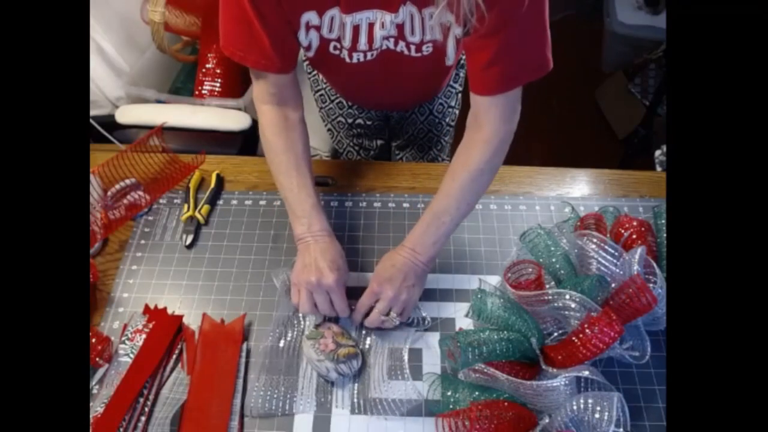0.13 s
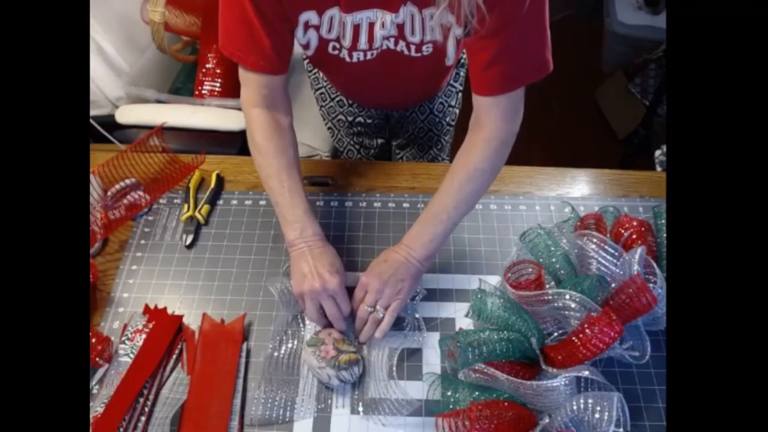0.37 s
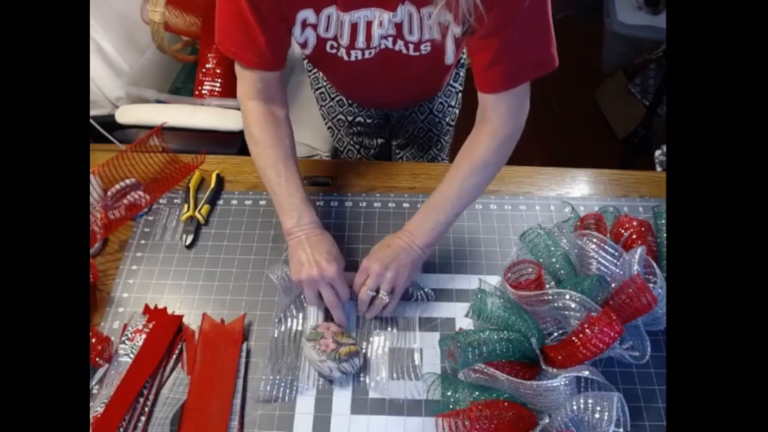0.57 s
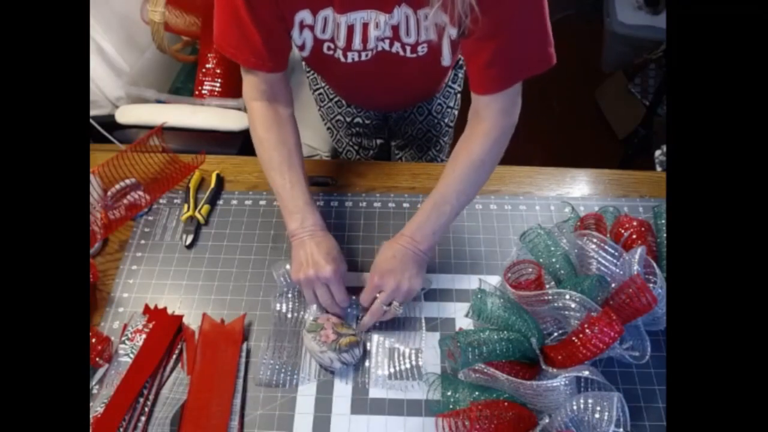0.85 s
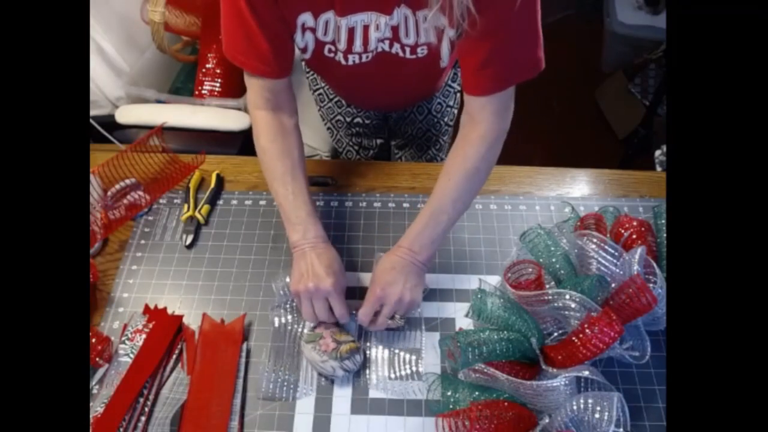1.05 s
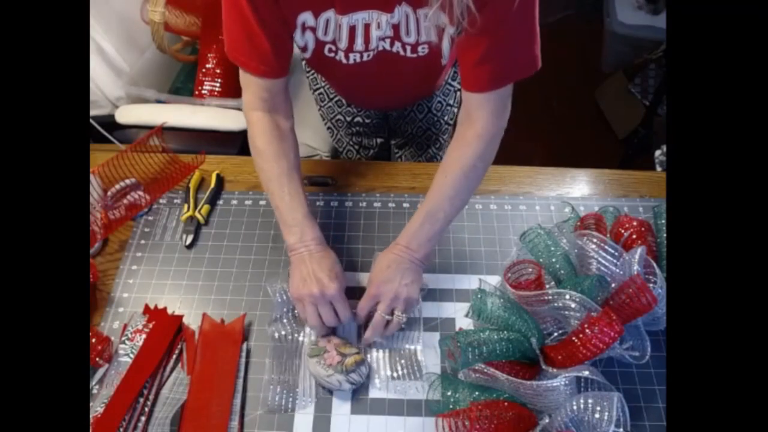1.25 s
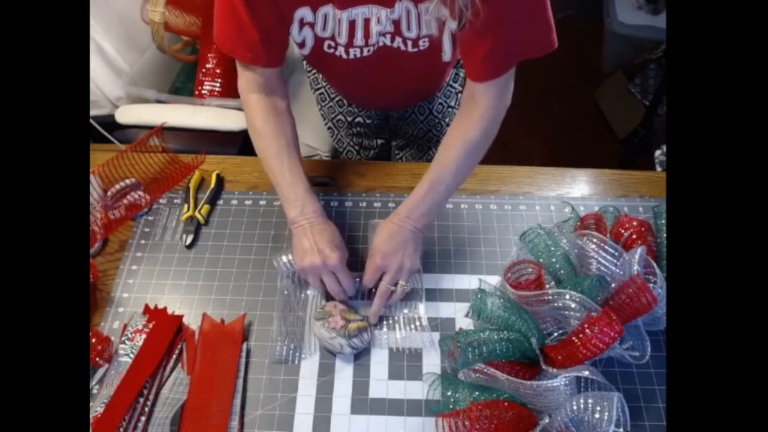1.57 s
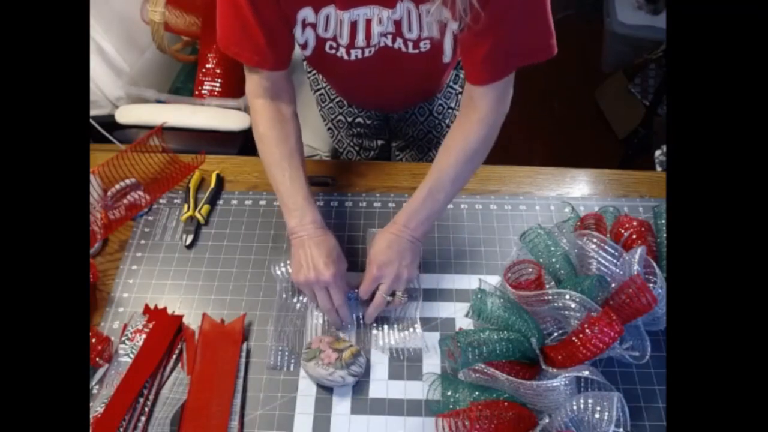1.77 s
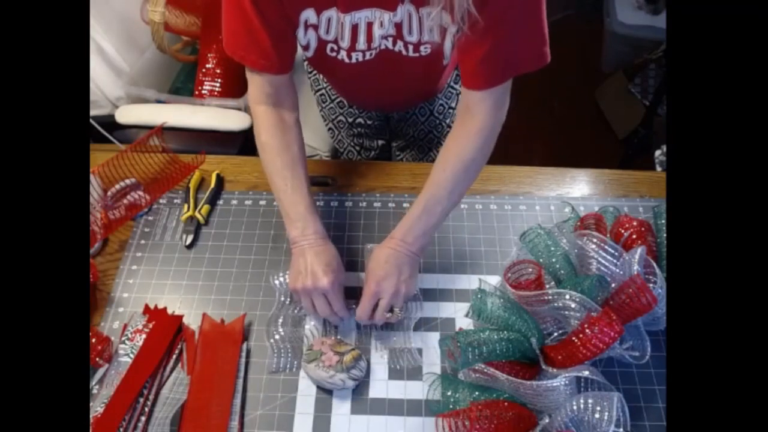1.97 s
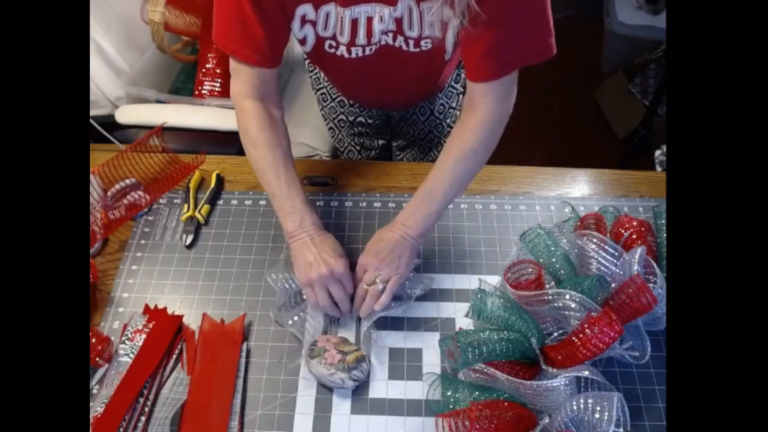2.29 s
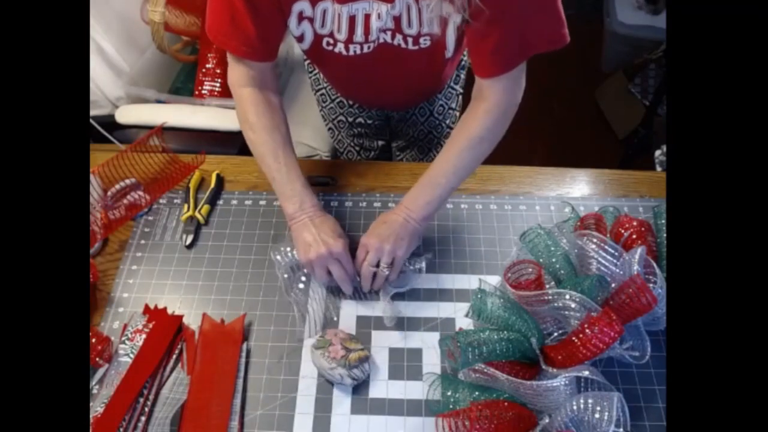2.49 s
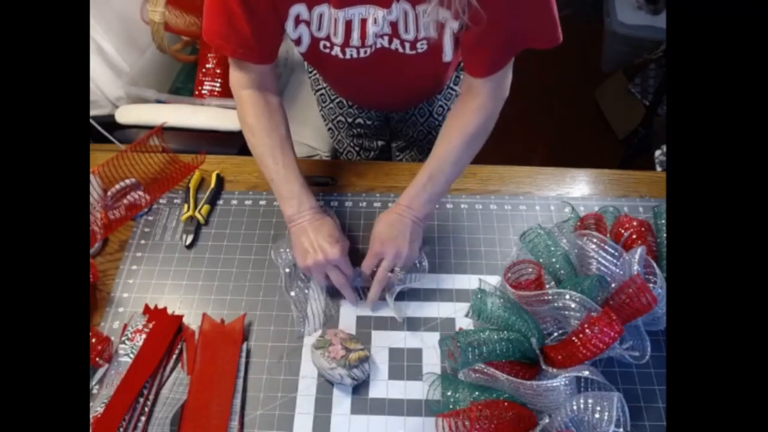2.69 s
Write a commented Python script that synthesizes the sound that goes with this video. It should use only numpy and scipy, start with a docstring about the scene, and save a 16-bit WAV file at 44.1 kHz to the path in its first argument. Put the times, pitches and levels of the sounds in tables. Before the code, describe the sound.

Crinkling plastic mesh swells and fades as it is scrunched and dragged over a work table, with tiny sharp snaps. Dull finger thumps and a low table rumble run underneath, with one light hollow knock, in a quiet small room.

```python
"""A low rumble and a faint rustle come first: hands gather plastic foil mesh on a cutting mat.
With each push the strands rub and snap, the mesh drags in small slips, and stick-slip friction
shakes the work table. Fingers land with soft thumps that excite the table's modes, at times
skidding the mesh, and once something harder knocks on the top and settles.
The small room hums faintly and adds a short reverberation."""
import sys
import numpy as np
from scipy import signal
from scipy.fft import rfft, irfft
from scipy.io import wavfile
from scipy.ndimage import uniform_filter1d

SR = 44100
rng = np.random.default_rng(int(sys.argv[2]) if len(sys.argv) > 2 else 0)


def bounce(signal):
    """Save signal as a 16-bit WAV file at the path given by the first command-line argument."""
    frames = np.transpose(np.atleast_2d(signal))
    limited = np.clip(frames, -1, 1)
    pcm = np.round(limited * 32767).astype(np.int16)
    wavfile.write(sys.argv[1], SR, pcm)


N = 125685
TIME = np.arange(N) / SR

# Levels in the tables are relative; the functions set the overall gains.
# Spectrum of the room's background noise: f/Hz, level/dB
ROOM_SPECTRUM = [(10, -10), (21, 7), (40, -5.5), (60, -0.5), (120, -15.5), (220, -40.5), (420, -15),
                 (700, -23.5), (1500, -55.5), (4000, -44.5), (7000, -37.5), (9000, -64)]
# Partials of the room's hum: f/Hz, level/dB
HUM_PARTIALS = [(247.6, -61), (302, -73.5), (366, -76.5), (436, -63.5), (532.9, -69.5), (666, -71)]
# Envelope of strands rubbing together, swelling with each push: t/s, level/dB
RUSTLE_ENVELOPE = [(0.0, -60.5), (0.13, -60), (0.24, -54.5), (0.29, -60), (0.42, -57.5), (0.53, -48.5),
                   (0.65, -47), (0.74, -60), (0.83, -55.5), (0.91, -51), (1.1, -57.5), (1.205, -67),
                   (1.27, -44.5), (1.35, -59.5), (1.43, -47), (1.53, -45), (1.61, -58.5), (1.71, -50),
                   (1.82, -51), (1.9, -56.5), (2.1, -64.5), (2.24, -54.5), (2.35, -46), (2.52, -51.5),
                   (2.63, -57.5), (2.7, -73.5), (2.78, -73.5), (2.85, -54.5)]
# Spectrum of the rubbing strands: f/Hz, level/dB
MESH_SPECTRUM = [(500, -21), (900, -18), (1500, -3.5), (2000, -2), (2800, 1.5), (3600, 0), (4600, -1.5),
                 (5600, 1), (6400, 1.5), (7200, -1.5), (7700, -8), (8100, -16), (9000, -33)]
# Envelope of the mesh dragging over the mat: t/s, level/dB
DRAG_ENVELOPE = [(0.0, -63), (0.3, -60.5), (0.46, -58.5), (0.54, -46.5), (0.63, -42.5), (0.72, -54.5),
                 (0.9, -54.5), (1.12, -58.5), (1.2, -65.5), (1.27, -50), (1.35, -57), (1.5, -45),
                 (1.66, -54), (1.71, -51), (1.83, -47), (2.0, -63), (2.23, -59), (2.34, -47.5),
                 (2.41, -46.5), (2.45, -48), (2.51, -49), (2.61, -58.5), (2.85, -68.5)]
# Spectrum of the mesh slipping on the mat: f/Hz, level/dB
DRAG_SPECTRUM = [(150, -21), (300, 5.5), (480, 3), (600, 1), (690, -1), (800, 1.5), (950, -1.5),
                 (1060, -1.5), (1250, -7), (1420, -12.5), (1540, -6.5), (1800, -15), (2600, -13.5),
                 (6000, -48.5)]
# Envelopes of the table's vibration under the hands: t/s, boom level/dB, body level/dB
RUMBLE_ENVELOPES = [(0.0, -44, -53), (0.15, -39.5, -49.5), (0.21, -24, -49), (0.28, -37.5, -41),
                    (0.41, -34.5, -47.5), (0.48, -29, -34.5), (0.55, -19.5, -34.5), (0.61, -25, -43),
                    (0.72, -31.5, -35), (0.83, -35.5, -50), (0.97, -28, -42.5), (1.08, -34.5, -39.5),
                    (1.21, -37, -46.5), (1.27, -29.5, -28), (1.33, -34, -35), (1.4, -22.5, -38),
                    (1.48, -30, -41), (1.62, -26, -34.5), (1.67, -30, -38), (1.72, -23, -28),
                    (1.8, -22.5, -35.5), (1.97, -38.5, -47), (2.12, -42.5, -56), (2.26, -48, -51.5),
                    (2.34, -27.5, -38.5), (2.44, -21, -31), (2.53, -47, -43.5), (2.68, -41, -67),
                    (2.85, -67, -62)]
# Spectrum of the table's deep boom: f/Hz, level/dB
BOOM_SPECTRUM = [(30, -27.5), (45, -22), (56, 6.5), (70, 2.5), (82, 7.5), (92, 14), (102, 5), (115, 1.5),
                 (145, -7), (220, -50.5), (900, -59)]
# Spectrum of the table's wooden body: f/Hz, level/dB
BODY_SPECTRUM = [(40, -37.5), (90, -19.5), (140, 8.5), (195, 4), (222, 1.5), (245, -2), (275, -8),
                 (308, 6.5), (324, -5), (343, 0.5), (375, -2), (440, -11.5), (600, -16), (1000, -38),
                 (3000, -73)]
# Fingers landing on the table: t/s, level/dB, contact low-pass f/Hz, boom f/Hz
FINGER_BLOWS = [(0.198, -32, 115, 78.6), (0.267, -44.5, 259, 99), (0.316, -42.5, 238, 101),
                (0.429, -31.5, 257, 100), (0.459, -22, 119, 87.3), (.662, -26, 156, 89),
                (0.748, -39, 224, 88), (0.943, -27, 171, 87), (1.236, -27, 170, 105),
                (1.263, -29, 250, 108), (1.294, -27.5, 330, 104), (1.318, -30, 220, 110),
                (1.347, -20.5, 180, 81), (1.623, -28.5, 148, 89.5), (1.6937, -22, 220, 85),
                (1.749, -33, 170, 90), (1.954, -37.5, 240, 100), (2.32, -27.5, 161, 85),
                (2.398, -18.5, 100, 90), (2.425, -18.5, 130, 92), (2.434, -22.5, 363, 95)]
# Modes of the table top above its boom: f/Hz, level/dB, T60/s
TOP_MODES = [(113, -11.5, 0.043), (152.8, -4, 0.045), (188, -2, 0.16), (233, 2, 0.032), (309, -10, 0.1),
             (342, -3.5, 0.22), (493, -0.5, 0.053)]
# Single strands snapping free: t/s, level/dB, ring f/Hz, tip level/dB relative to the snap
STRAND_SNAPS = [(0.3127, -31.5, 6400, -16), (0.322, -49, 6500, -2), (0.3482, -38, 5900, -17),
                (0.364, -39, 3200, -14.5), (0.407, -36.5, 6040, -7), (0.4248, -44, 6200, -7),
                (0.4336, -32.5, 6260, -14), (0.4409, -34, 3250, -18), (0.5145, -30.5, 5260, -25),
                (0.5339, -31, 3200, -22), (0.5616, -29.5, 3400, -30), (0.57, -28.5, 6230, -23),
                (0.7568, -40, 2900, -10), (0.782, -34, 5830, -18), (0.9034, -35, 2840, -24),
                (1.1328, -37, 3500, -24), (1.227, -43.5, 2920, -16), (1.2494, -38.5, 2840, -23),
                (1.255, -34, 5500, -19), (1.267, -32, 2730, -16), (1.2808, -43, 2600, -22),
                (1.297, -36, 5800, -22), (1.3133, -35.5, 6640, -19), (1.6265, -28.5, 7000, -3),
                (1.642, -35.5, 6460, -10), (1.694, -36, 6300, -21), (1.71, -44, 3500, -8.5),
                (1.729, -32, 3960, -24), (1.771, -34.5, 2940, -18), (1.8185, -30, 6300, -13),
                (1.869, -41.5, 6200, -16), (2.063, -43.5, 6200, -14), (2.1253, -44.5, 3380, -20),
                (2.1808, -39.5, 5800, -22), (2.2887, -45, 6140, -26), (2.371, -32.5, 6100, -12),
                (2.587, -46, 5360, -18), (2.6932, -46, 5850, -18), (2.7276, -50, 5980, -20),
                (2.801, -47, 5960, -18), (2.843, -41, 6200, -14)]
# The mesh skidding as a finger lands: t/s, level/dB, decay time constant/s
SKIDS = [(0.759, -50, 0.026), (1.388, -46.5, 0.029), (1.696, -42.5, 0.042), (2.436, -41.5, 0.056)]
# A hard object striking the top and settling: t/s, level/dB
HARD_BLOWS = [(1.8864, -27.5), (1.9075, -33), (1.9229, -37.5), (2.03, -49)]
# Modes excited by the hard object: f/Hz, level/dB, T60/s
HOLLOW_MODES = [(253, 5, 0.024), (336.6, 1, 0.1), (493, -3.5, 0.08), (596, 0, 0.074), (770, -2, 0.037),
                (835.7, -9, 0.23), (938, -19, 0.15), (1125, -11.5, .05)]

# Ratios of reverberant to direct sound shared by several sources
DRAG_WET_DB, TABLE_WET_DB = -9, -16.5


def from_db(db):
    """Amplitude ratio of a level: a factor of ten per 20 dB."""
    return 10 ** (np.asarray(db) / 20)


def unit_rms(x):
    """Normalisation to unit mean power."""
    return x / np.sqrt(np.mean(x ** 2) + 1e-20)


def envelope(rows, column=1):
    """Gain curve, linear in dB between points: exponential growth and decay."""
    rows = np.array(rows)
    return from_db(np.interp(TIME, rows[:, 0], rows[:, column]))


def colour(x, spectrum):
    """Minimum-phase filtering to the given spectrum, at unit rms."""
    size = 2 ** 18
    hz, db = np.transpose(spectrum)
    bin_hz = np.arange(size // 2 + 1) * SR / size
    log_gain = np.log(from_db(np.interp(np.log(bin_hz + 1), np.log(hz), db)))
    cepstrum = irfft(log_gain)
    cepstrum[1:size // 2] *= 2  # folding onto positive time makes the filter causal
    cepstrum[size // 2 + 1:] = 0
    return unit_rms(irfft(rfft(x, size) * np.exp(rfft(cepstrum)))[:N])


def butter(x, hz, kind, order=2):
    """Filtering with a maximally flat passband."""
    return signal.sosfilt(signal.butter(order, hz, kind, fs=SR, output="sos"), x + 1e-18)


def ring(force, hz, t60):
    """Damped oscillator: a unit impulse starts a unit sine that falls 60 dB in t60 seconds."""
    radius = np.exp(-np.log(1000) / (t60 * SR))
    angle = 2 * np.pi * hz / SR
    return signal.lfilter([0, np.sin(angle)], [1, -2 * radius * np.cos(angle), radius ** 2], force + 1e-18)


def impulse(onset_s, db):
    """Ideal impact: one sample, with a flat spectrum."""
    return from_db(db) * (np.arange(N) == int(onset_s * SR))


def grains(per_s, spread_db):
    """Shot noise at unit rms; a positive spread makes a few impacts stronger, a negative one weaker."""
    sizes = from_db(spread_db * np.minimum(rng.exponential(1, N), 4.5))
    signs = rng.choice([-1, 1], N)
    return unit_rms(sizes * signs * (rng.random(N) < per_s / SR))


def in_room(x, wet_db, t60=0.17):
    """Reverberation: direct sound plus a diffuse tail for each channel, strongest in the upper mids."""
    t = TIME[:SR // 2]
    tail = rng.standard_normal((2, len(t))) * np.exp(-np.log(1000) * t / t60)
    tail /= np.sqrt(np.sum(tail ** 2, axis=1, keepdims=True))
    tail += 1.25 * butter(tail, [900, 2600], "band", order=1)
    wet = from_db(wet_db)
    return (x + wet * signal.fftconvolve(x[None], tail, axes=1)[:, :N]) / np.sqrt(1 + wet ** 2)


def room_tone():
    """Narrow resonances driven by noise give a wavering hum, amid rumble, wide hiss and a faint whine."""
    rumble = from_db(-48.5) * colour(rng.standard_normal(N), ROOM_SPECTRUM)
    hum = 0
    for hz, db in HUM_PARTIALS:
        drive = butter(rng.standard_normal(N), hz / 2, "high")
        hum += from_db(db) * unit_rms(ring(drive, hz, t60=1.2))
    hiss = from_db(-63) * unit_rms(butter(rng.standard_normal((2, N)), 600, "low", order=1))
    whine = from_db(-82) * np.sin(2 * np.pi * 8000 * TIME)
    return rumble + hum + hiss + whine


def rustle():
    """Friction between strands: briefly ringing ticks over a fine hiss, with sparse bright crackles."""
    gain = envelope(RUSTLE_ENVELOPE)
    activity = gain / gain.mean()
    ticks = sum(unit_rms(ring(grains(per_s=85 * activity, spread_db=3.4), hz, t60=0.002))
                for hz in np.linspace(1800, 7800, num=12))
    ticks = from_db(-2.5) * unit_rms(ticks / np.sqrt(activity))  # density alone adds no power
    friction = grains(per_s=8000, spread_db=2.5)
    rubbing = colour(ticks + friction, MESH_SPECTRUM) * gain
    crackles = butter(grains(per_s=90, spread_db=2.5), 4200, "high", order=1)
    crackles = from_db(-8) * colour(crackles, MESH_SPECTRUM) * gain.mean() * activity ** 0.95
    return in_room((rubbing + crackles) * from_db(-4.5), wet_db=-3.5)


def drag():
    """Stick-slip friction: the mesh grid catches on the mat in a dense run of small slips."""
    slips = colour(grains(per_s=1800, spread_db=-2.0), DRAG_SPECTRUM)
    return in_room(slips * envelope(DRAG_ENVELOPE) * from_db(-0.5), DRAG_WET_DB)


def table_rumble():
    """Forced vibration: fingers stick and slip, driving the table's deep boom and its wooden body."""
    boom = colour(grains(per_s=410, spread_db=1.0), BOOM_SPECTRUM)
    running_rms = np.sqrt(uniform_filter1d(boom ** 2, size=1800) + 1e-6)
    boom = unit_rms(boom / running_rms ** 0.8)  # evens out most of the random swells
    boom *= envelope(RUMBLE_ENVELOPES, column=1) * from_db(-8)
    body = colour(grains(per_s=410, spread_db=-1.5), BODY_SPECTRUM)
    body *= envelope(RUMBLE_ENVELOPES, column=2) * from_db(-4)
    return in_room(boom + body, TABLE_WET_DB)


def thumps():
    """Modal response to soft fingertip blows; the boom's pitch depends on where and how the hand presses."""
    force, boom = 0, 0
    for onset_s, db, contact_hz, boom_hz in FINGER_BLOWS:
        blow = butter(impulse(onset_s, db - 4.5), contact_hz, "low")
        blow = butter(blow, 68, "high", order=4)
        force += blow
        boom += from_db(8.5) * ring(blow, boom_hz, t60=0.12)
    body = sum(from_db(db) * ring(force, hz, t60) for hz, db, t60 in TOP_MODES)
    return in_room(-(boom + body), TABLE_WET_DB)


def snaps():
    """Sudden release: a slipping strand emits a broad burst and rings; the sharpest have a bright tip."""
    fall_s, tail_s, bandwidth_hz = 0.0013, 0.007, 1500
    ring_t60 = np.log(1000) / (np.pi * bandwidth_hz)
    t = TIME[:2048]
    decay = np.exp(-t / fall_s) + 0.13 * np.exp(-t / tail_s)
    bodies, tips = np.zeros((2, N + SR))
    for onset_s, db, hz, tip_db in STRAND_SNAPS:
        burst = rng.standard_normal(len(t)) * decay
        tone = unit_rms(ring(np.diff(burst, prepend=0), hz, ring_t60))
        broadband = unit_rms(butter(burst, 1500, "high"))
        body = unit_rms(butter(tone + 1.4 * broadband, 6820, "low", order=5))
        tip = unit_rms(butter(burst, [9100, 15500], "band", order=4))
        tip = from_db(tip_db) * butter(tip, 11500, "low", order=3)
        start, gain = int(onset_s * SR), from_db(db - 23)
        bodies[start:start + len(t)] += gain * body
        tips[start:start + len(t)] += gain * tip
    return in_room(bodies[:N], wet_db=-5.5) + tips[:N]


def scuffs():
    """Sliding friction: the mesh skids under a landing finger in slips that die away exponentially."""
    gain = sum(from_db(db) * (TIME >= onset_s) * np.exp(-np.abs(TIME - onset_s) / fall_s)
               for onset_s, db, fall_s in SKIDS)
    slips = colour(grains(per_s=2500, spread_db=2.0), DRAG_SPECTRUM)
    return in_room(slips * gain, DRAG_WET_DB)


def knock():
    """Free vibration after a hard impact: a dull, heavily damped crack, then hollow ringing modes."""
    blows = sum(impulse(onset_s, db) for onset_s, db in HARD_BLOWS)
    force = butter(blows, 920, "low", order=4)
    modes = sum((-1) ** k * from_db(db - 1.5) * ring(force, hz, t60)
                for k, (hz, db, t60) in enumerate(HOLLOW_MODES))
    crack = from_db(13) * ring(force, hz=390, t60=0.0031)
    return in_room(modes + crack, wet_db=-16.5)


def scene():
    """Superposition: the table is central; a level difference sets the mesh slightly to the right."""
    pan = from_db([[-0.6], [0.6]])
    mesh = (rustle() + snaps() + drag() + scuffs()) * pan
    return mesh + table_rumble() + thumps() + knock() + room_tone()


def record(dry):
    """Band limiting: the top is cut steeply and only a trace leaks past, over faint electronic hiss."""
    passband = butter(dry, 8600, "low", order=24)
    leak = from_db(-18.5) * butter(butter(dry, 8500, "high"), 12500, "low")
    hiss = from_db(-99) * (rng.standard_normal(N) + 0.5 * rng.standard_normal((2, N)))
    return butter(passband + leak + hiss, 15200, "low", order=16)


dry = scene()
out = record(dry)
bounce(out)
```